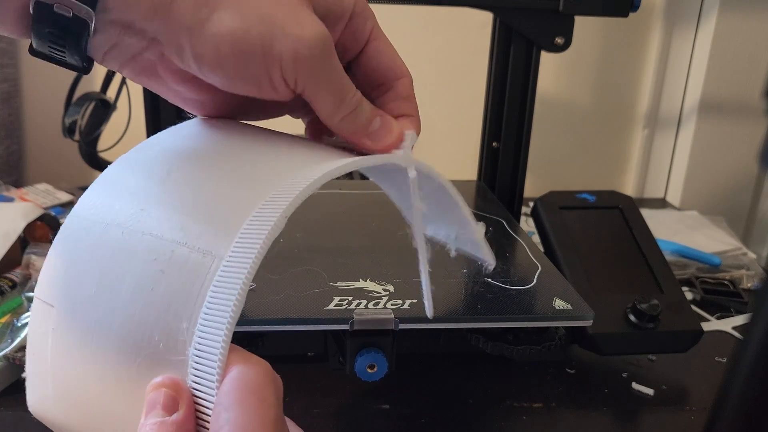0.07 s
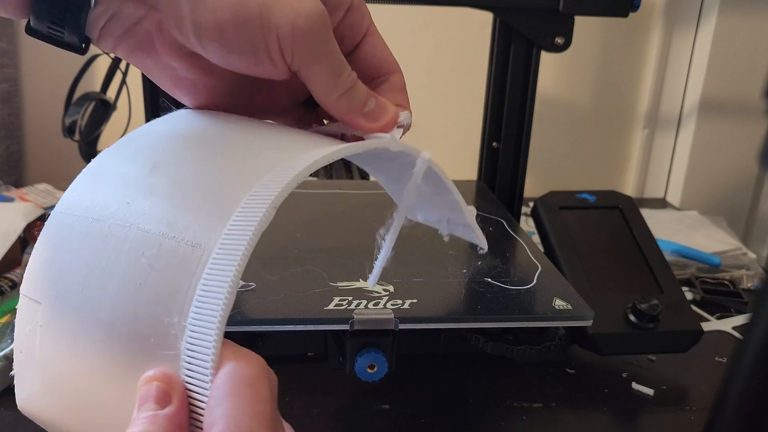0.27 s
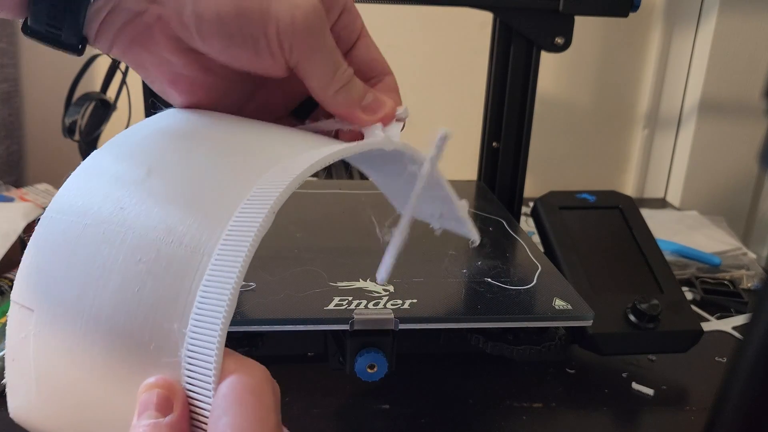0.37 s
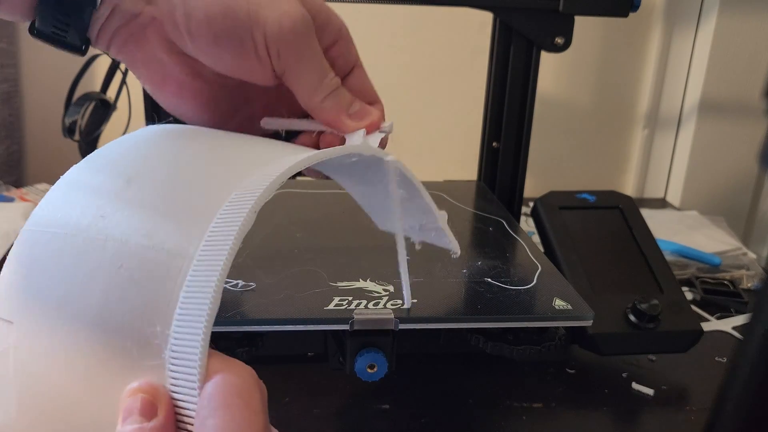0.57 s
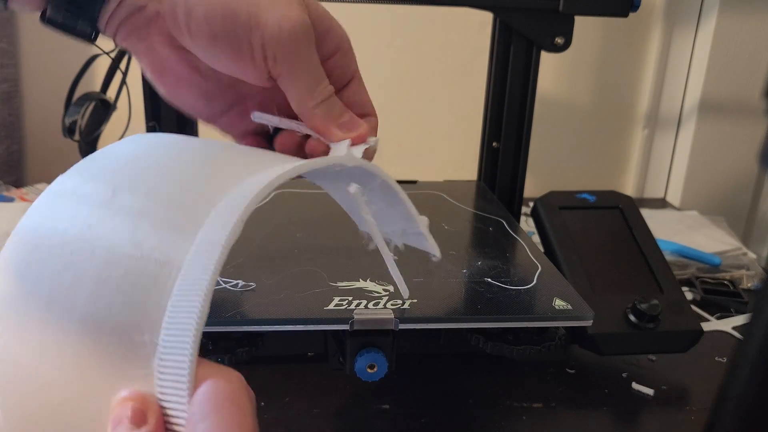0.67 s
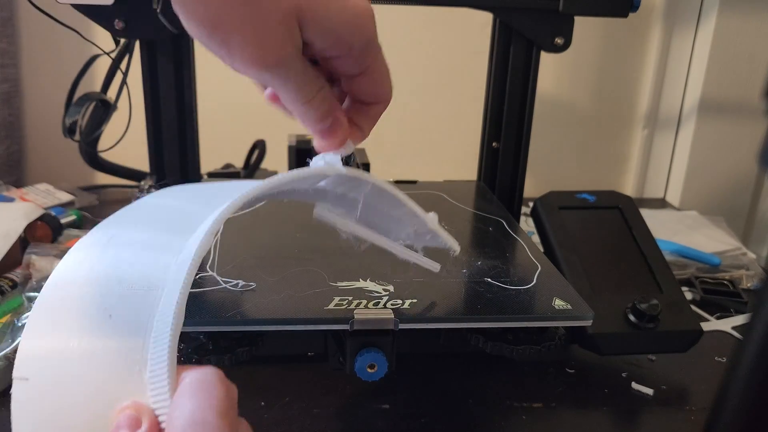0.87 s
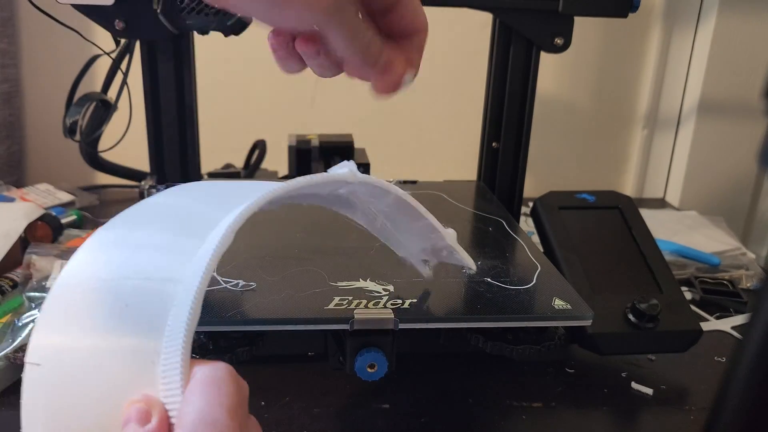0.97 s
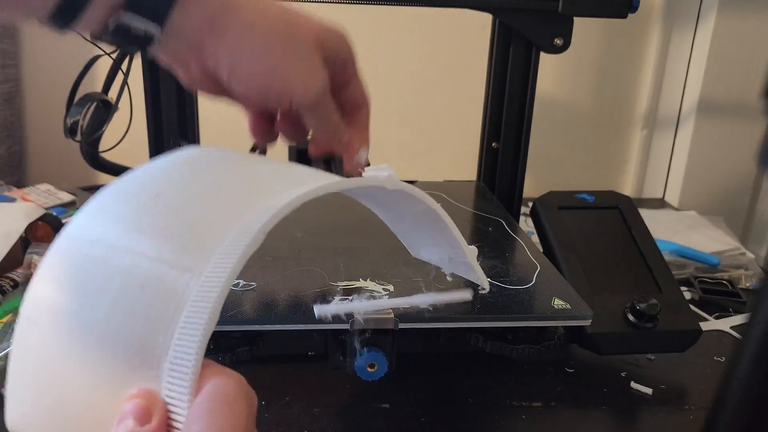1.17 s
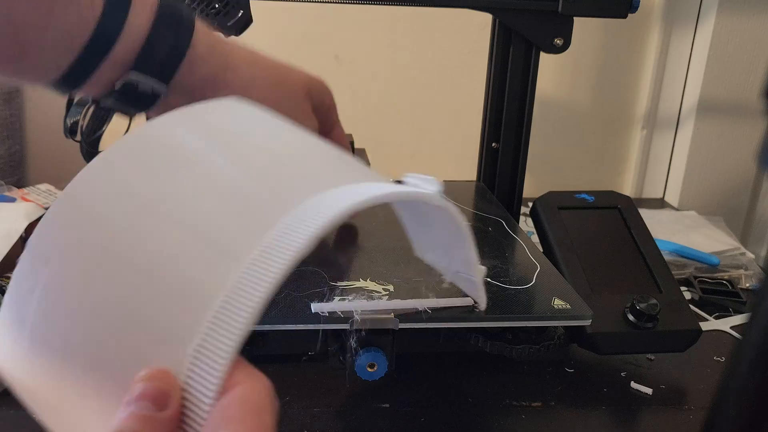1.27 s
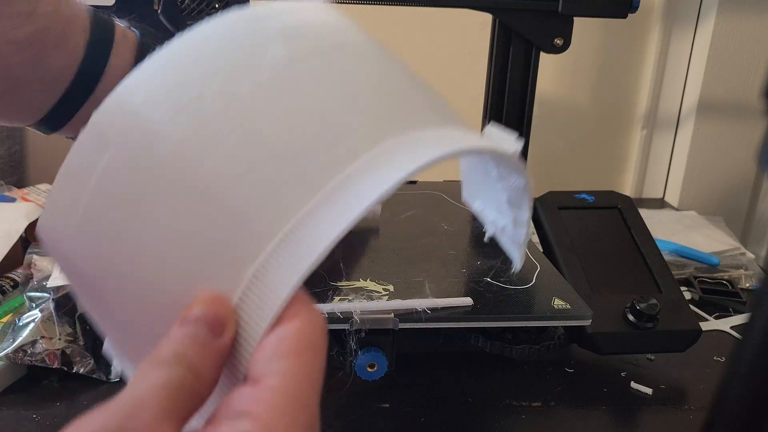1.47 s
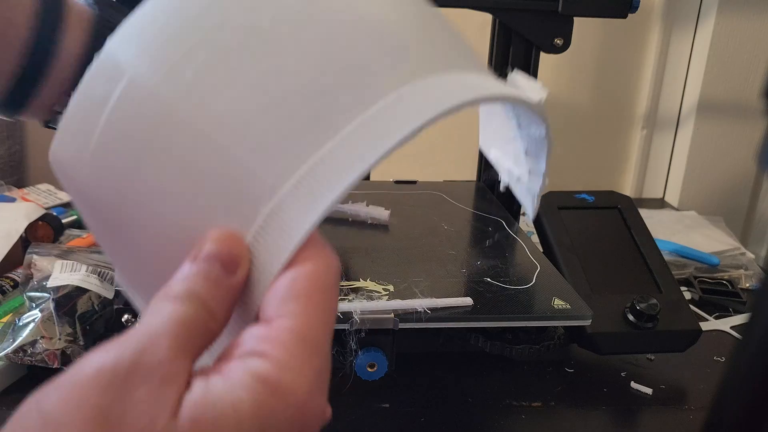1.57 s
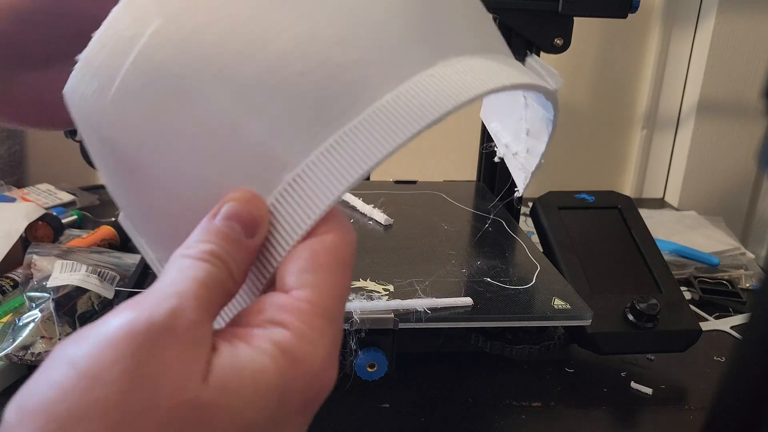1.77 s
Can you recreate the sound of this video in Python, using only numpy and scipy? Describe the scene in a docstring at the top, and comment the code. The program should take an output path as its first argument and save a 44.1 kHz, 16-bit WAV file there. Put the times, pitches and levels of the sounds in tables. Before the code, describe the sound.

Brittle plastic snapping: sharp dense cracks in quick bursts, thinning to faint ticks and creaks

```python
"""Thin plastic support strands crack off a curved printed shell, flexed by two hands close to a stereo microphone pair.
Each crack is a short rough noise burst filtered by the shell's resonances, with two dying notes; splinters trail it.
A small metal part ticks at the wrist: noise through sharp high resonances. Fingers rustle (bright noise grains)
and rumble (low noise) on the shell. A small room answers with noise tails, over a faint hum, tones and hush."""
import sys
import numpy as np
from scipy import signal
from scipy.fft import rfft, irfft, next_fast_len
from scipy.io import wavfile
from scipy.ndimage import map_coordinates

SR = 44100
rng = np.random.default_rng(int(sys.argv[2]) if len(sys.argv) > 2 else 0)


def wav_out(sig):
    """Save sig, one row per channel (or a flat mono array), as 16-bit PCM at SR to the path in sys.argv[1]."""
    wavfile.write(sys.argv[1], SR, np.round(np.clip(np.atleast_2d(sig).T, -1, 1) * 32767).astype(np.int16))


N = 79380  # samples, 1.8 s


def amp(db):
    """dB to gain."""
    return 10 ** (np.asarray(db) / 20)


def unit(x):
    """Scaled to rms 1."""
    return x / np.sqrt(np.mean(x ** 2) + 1e-20)


def along(points, hz):
    """(Hz, value) points read on a log frequency axis."""
    f, v = np.transpose(points)
    return np.interp(np.log(hz + 1), np.log(f + 1), v)


def over_time(points):
    """(s, value) points joined by straight lines over the whole scene."""
    return np.interp(np.arange(N) / SR, *np.transpose(points))


def wobble(rate, size=N):
    """A smooth random curve around 0, rate knots a second."""
    knots = rng.standard_normal(size // 8 + 8)
    return map_coordinates(knots, [np.arange(size) * min(rate / SR, 1 / 8)])


def wavering_sine(hz, drift_hz, drift_rate):
    """A sine of rms 1 whose pitch drifts at random."""
    return np.sqrt(2) * np.sin(2 * np.pi * np.cumsum(hz + drift_hz * wobble(drift_rate)) / SR)


def filtered(x, response):
    """x times a complex response of frequency, padded against wrap-around."""
    m = next_fast_len(x.shape[-1] + 4096)
    spectrum = rfft(x, m) * response(np.fft.rfftfreq(m, 1 / SR))
    return irfft(spectrum, m)[..., :x.shape[-1]]


def band(lo_hz, hi_hz):
    """Causal band-pass with power gain 1 for white noise."""
    def edges(f):
        low_cut = (1j * f / lo_hz / (1 + 1j * f / lo_hz)) ** 2
        return low_cut / (1 + 1.4j * f / hi_hz - (f / hi_hz) ** 2) ** 2
    return lambda f: edges(f) / np.sqrt(np.mean(np.abs(edges(f)) ** 2))


def ring(f, hz, width):
    """Response of one resonance, gain 1 at its centre."""
    return 1j * f * width / (hz * hz - f * f + 1j * f * width)


# Hush of the room. Each row: frequency in Hz, relative density in dB per Hz.
HUSH_SPECTRUM = [(15, -32.5), (25, -4), (192, -6), (358, -5), (706, -12.5), (1430, -21), (1600, -19),
                 (9330, -31.5), (15200, -25.5), (16500, -50)]
# How alike the hush is at the two ports. Each row: frequency in Hz, left-right correlation.
HUSH_LIKENESS = [(40, 1), (250, 0.43), (1000, .3), (4000, .05)]
# Low hum. Each row: time in seconds, middle level in dB rms.
HUM_LEVEL = [(0.0, -63.5), (0.42, -62), (0.626, -68), (0.802, -62), (0.922, -65.5), (1.148, -66.5),
             (1.724, -66.5), (1.8, -67.5)]
# Faint wavering tones in the room. Each row: middle frequency in Hz, middle level in dB rms.
ROOM_TONES = [(195, -77.5), (725, -77)]
HUSH_DB, HUSH_WAVER_DB = -63.5, 2.5
HUM_HZ, HUM_WAVER_DB, TONE_WAVER_DB = 58, 2.5, 9


def background():
    """Room hush, most alike at both ports in the bass, an unsteady low hum and faint tones."""
    def mid_side(hz):
        turn = np.arccos(np.clip(along(HUSH_LIKENESS, hz), -1, 1)) / 2
        return amp(along(HUSH_SPECTRUM, hz)) * [np.cos(turn), np.sin(turn)]
    mid, side = filtered(rng.standard_normal((2, N)), mid_side)
    hush = np.array([mid + side, mid - side]) / np.sqrt(np.mean(mid ** 2))
    hum = wavering_sine(HUM_HZ, 2.2, 0.9) * amp(over_time(HUM_LEVEL) + HUM_WAVER_DB * wobble(26))
    tones = sum(amp(db + TONE_WAVER_DB * wobble(21)) * wavering_sine(hz, 4, 2.9) for hz, db in ROOM_TONES)
    return amp(HUSH_DB + HUSH_WAVER_DB * wobble(18)) * hush + hum + tones


# Decay of the small room. Each row: frequency in Hz, time to fall 60 dB in seconds.
ROOM_DECAY = [(150, 0.06), (700, 0.25), (2500, 0.23), (6000, 0.22), (14000, 0.2)]
ROOM_DB, ROOM_DELAY_S = -10.5, 0.0024
FLUTTER_DB, FLUTTER_PER_S = 3, 90  # the echo's level flutters at random


def room(x):
    """Noise tails dying at each frequency's own speed, new for every 0.15 s of sound; their level flutters."""
    out, step = np.zeros((2, N + SR)), int(.15 * SR)
    for at in range(0, N, step):
        hz, t, z = signal.stft(rng.standard_normal((2, SR // 2)), SR, nperseg=256)
        decay = amp(-60 * t / along(ROOM_DECAY, hz)[:, None])
        tail = signal.istft(z * decay, SR, nperseg=256)[1]
        wet = signal.fftconvolve(x[:, at:at + step], tail / np.linalg.norm(tail[0]), axes=1)
        out[:, at + round(ROOM_DELAY_S * SR):][:, :wet.shape[1]] += wet
    return out[:, :N] * amp(FLUTTER_DB * wobble(FLUTTER_PER_S))


# Hands on the shell. Each row: time in seconds, middle level of the low rumble in dB rms.
HANDLING_LEVEL = [(0.0, -64), (0.46, -65.5), (0.836, -68), (1.178, -64), (1.308, -68.5), (1.724, -70),
                  (1.8, -65.5)]
HANDLING_HZ, HANDLING_LUMP_DB = (80, 190), 3


def handling():
    """Hands shifting the shell give a lumpy low rumble: band-passed noise, partly shared by the ports."""
    shared, left, right = rng.standard_normal((3, N))
    pair = np.array([shared + 0.33 * left, shared + 0.62 * right])
    low = unit(filtered(pair, band(*HANDLING_HZ)))
    return low * amp(over_time(HANDLING_LEVEL) + HANDLING_LUMP_DB * wobble(11))


# Brushing close to the ports. Each row: time in seconds, level of the fine rustle in dB.
RUSTLE_LEVEL = [(0.0, -58.5), (0.254, -65), (0.36, -60), (0.466, -47), (0.742, -62), (1.298, -66.5),
                (1.448, -87), (1.8, -83)]
RUSTLE_PER_S, RUSTLE_T60, RUSTLE_HZ = 690, .015, 4003  # grains a second, decay in s, low edge in Hz
RUSTLE_SPREAD_DB = 3


def rustle():
    """Loose plastic hairs and fingers brush the shell: tiny bright noise grains at random moments."""
    t = np.arange(SR // 50) / SR
    strength = amp(RUSTLE_SPREAD_DB * rng.exponential(size=N))
    hits = (rng.random(N) < RUSTLE_PER_S / SR) * strength
    envelope = np.convolve(hits, amp(-60 * t / RUSTLE_T60))[:N]
    grains = envelope * rng.standard_normal((2, N))
    bright = unit(filtered(grains, band(RUSTLE_HZ, SR / 2.2)))
    return bright * amp(over_time(RUSTLE_LEVEL))


# Ticks at the wrist. Each row: start in seconds, level in dB, swell in seconds.
WRIST_TICKS = [(.006, -35, 0.018), (0.134, -50, 0.0077), (0.289, -46.5, 0.017), (0.337, -47, 0.0062)]
# Metal resonances, each applied twice. Each row: frequency in Hz, level in dB, width of one pass in Hz.
METAL_MODES = [(7125, -15, 590), (11480, 12, 200), (11780, -12.5, 1500), (12490, -8.5, 200)]
TICK_T60, TICK_PAN_DB = 0.029, -6  # decay in s; negative leans right


def ticks():
    """A small metal part scrapes briefly and sings high and thin: noise through narrow resonances."""
    out, t = np.zeros(N + SR), np.arange(SR // 8) / SR

    def metal(f):
        return sum(amp(level) * ring(f, hz, width) ** 2 for hz, level, width in METAL_MODES)
    for s, db, swell in WRIST_TICKS:
        song = unit(filtered(rng.standard_normal(len(t)), metal))
        envelope = np.where(t < swell, (t / swell) ** 2, amp(-60 * (t - swell) / TICK_T60))
        out[round(s * SR):][:len(t)] += amp(db) * song * envelope
    return out[:N] * amp([[TICK_PAN_DB / 2], [-TICK_PAN_DB / 2]])


def struck(after, hz, q, rise):
    """One dying note, pushed either way."""
    decay = np.exp(-np.pi * hz * after / q)
    return rng.choice([-1, 1]) * np.sin(2 * np.pi * hz * after) * (1 - np.exp(-after / rise)) * decay


# Resonances of the shell. Each row: frequency in Hz, width in Hz, middle level in dB over the bare crack.
SHELL_MODES = [(1076, 59, 2), (1321, 110, 2.5), (1682, 22, -2.5), (2240, 250, -15.5), (2437, 70, 3),
               (3110, 380, 2), (3720, 160, -2.5), (6314, 24, 4.5), (7210, 92, -4)]
MODE_SCATTER_DB = 3  # change of each mode from crack to crack
STRAND_Q, STRAND_DB = 5, -2  # sharpness and level of the strand's own note in the burst


def shell(strand_hz):
    """The bare crack, the strand's note and the shell's resonances, weighted anew for each breaking point."""
    new_db = MODE_SCATTER_DB * rng.standard_normal(len(SHELL_MODES))

    def response(f):
        strand = amp(STRAND_DB) * ring(f, strand_hz, strand_hz / STRAND_Q)
        modes = sum(amp(db + new) * ring(f, hz, width) for (hz, width, db), new in zip(SHELL_MODES, new_db))
        return 1 + strand + modes
    return response


LEAD_S, NOTE_LEAD_S = 0.00017, .00007  # left port hears first; the notes lead by less than the bursts
UNLIKE_DB, UNLIKE_HZ = 3, 930  # part of each burst that differs between ports, fading below this Hz
ONSET_S = 0.0004  # delay from each row's time to the burst's front
RISE_S, SOFTER = .0004, .15  # attack of a crack at 0 dB; dB longer for each dB weaker
SNAP_DB, SNAP_T60 = -3, 0.0028  # sharp front of each burst
SWELL_DB, SWELL_S = -27, .005  # faint noise rising for a few ms before each burst
GRAIN_DB, GRAINS_PER_S = 2.5, 1500  # unevenness of the burst
SPLINTERS_PER_S, SPLINTER_DB, SPLINTER_T60, SPLINTER_SPREAD_DB = 250, -3, .07, 2.5  # trailing crackle
NOTE_DB, NOTE_Q, NOTE_RISE_S = 1.5, 18, .0008  # the strand's note rung clear, over the crack's level
KNOCK_DB, KNOCK_Q = 5, 4.75  # the shell's low knock, over the row's band levels read at its pitch
# Breaking strands. Each row: time in seconds, level in dB, levels of the five bands in dB over it before
# the band gain, strand note in Hz, knock in Hz, left over right in dB, burst t60 in seconds before the stretch.
STRAND_CRACKS = [(0.055, -18, -27.5, -12.5, -7.5, -10, -18, 2006, 723, 9, 0.012),
                 (0.201, -2, -37, -11, -12.5, -9.5, -15, 3240, 154, 8, 0.0083),
                 (0.204, -11.5, -28, -10.5, -6.5, -24, -20, 2130, 248, -2.5, 0.03),
                 (0.221, -7.5, -38, -25, -15.5, -13, -15.5, 3010, 480, 8.5, 0.028),
                 (0.231, -15.5, -29, -28, -19, -14, -16.5, 2740, 267, 7, 0.034),
                 (0.236, -18.5, -20.5, -20, -15, -8.5, -11.5, 3116, 130, 5, 0.014),
                 (0.255, -23.5, -32, -39, -37, -11, -13, 3030, 404, 1, 0.024),
                 (0.258, -20.5, -45, -46, -36, -21, -6.5, 2970, 390, 4.5, 0.019),
                 (0.361, -16.5, -35, -21.5, -17.5, -11, -12.5, 3066, 390, 9.5, 0.016),
                 (0.412, -28.5, -33, -28, -17, -15.5, -15, 3070, 410, -8.5, 0.048),
                 (0.428, -15.5, -23, -51, -9.5, -5.5, -11.5, 3350, 280, 5.5, 0.031),
                 (0.435, -5, -67, -27, -11, -9, -9.5, 3724, 700, 2.5, 0.014),
                 (0.442, -11.5, -41, -21, -8.5, -11, -10.5, 2950, 670, 1.5, 0.017),
                 (0.446, -19, -50, -45, -18, -31, -11, 3360, 774, 1.5, 0.02),
                 (0.452, -24, -24.5, -26, -9.5, -9, -20, 1810, 650, 0, 0.046),
                 (0.557, -43, -26, -23, -9, -9, -14.5, 3630, 371, 4, 0.098),
                 (0.579, -31, -19.5, -12, -4.5, -1, -2, 2840, 690, 5.5, 0.045),
                 (0.615, -11.5, -25, -10, -7, -8, -10, 2044, 730, 6.5, 0.018),
                 (0.627, -24, -33, -14, -14, -20, -7, 3440, 76, 5, 0.017),
                 (0.637, -17.5, -42, -34, -18.5, -11.5, -17, 3220, 678, -2.5, 0.016),
                 (0.645, -16, -43, -16, -25, -7, -6.5, 3880, 229, 4, 0.011),
                 (0.655, -20.5, -33, -15, -12.5, -6.5, -11, 4160, 400, 1.5, 0.053),
                 (0.659, -27.5, -15, -13.5, -10, -1, 2.5, 2800, 393, 12.5, 0.018),
                 (0.662, -13.5, -26, -10.5, -15, -11.5, -9, 3180, 980, 4.5, 0.02),
                 (0.747, -38.5, -32, -23, -31, -34, -7.5, 4300, 277, 7.5, 0.018),
                 (0.813, -46, -17, -29, -7, -22, -0.5, 3750, 143, 8.5, 0.05),
                 (0.818, -40.5, -41, -28, -15, 0, -11, 3030, 393, 4, 0.026),
                 (0.824, -25, -24, -10.5, -9, -0.5, -1, 4100, 944, 8, 0.029),
                 (0.846, -17, -33, -33, -23.5, -8.5, -11, 3190, 398, 7, 0.02),
                 (0.854, -22, -29, -22.5, -16.5, -15, -19.5, 2580, 403, 4.5, 0.056),
                 (0.87, -37, -23, -17, -27, -34, -26.5, 2440, 229, 0.5, 0.026),
                 (0.899, -34.5, -19.5, -21, -13, -30, -17.5, 2940, 308, 14.5, 0.0066),
                 (0.921, -27, -44, -19, -50, -8, -5, 3080, 135, 6.5, 0.021),
                 (0.931, -24, -32, -32, -12.5, -14.5, -14.5, 2900, 799, 9.5, 0.019),
                 (0.939, -29, -56, -22.5, -48, -11, -17.5, 2880, 164, 5.5, 0.022),
                 (0.951, -32, -28, -34, -12.5, -11, -22, 3080, 217, 5.5, 0.016),
                 (1.021, -21, -18.5, -6, -5.5, -15, -17.5, 3052, 254, 13.5, 0.015),
                 (1.023, -20.5, -31.5, -49, -17.5, -15, -15.5, 2180, 124, 4.5, 0.067),
                 (1.052, -25, -26, -9, -12.5, -15, -12.5, 3450, 640, 4.5, 0.0096),
                 (1.074, -40.5, -14.5, -18, -12, -10, -9, 2310, 320, 7.5, 0.049),
                 (1.094, -41, -21.5, -26.5, -26, -9.5, -9.5, 3430, 234, 4.5, 0.067),
                 (1.12, -43.5, -26, -24.5, -20, -11.5, -16, 2800, 199, 6, 0.021),
                 (1.135, -46.5, -16, -12.5, -13, -17, -18, 3070, 133, 7, 0.12),
                 (1.227, -42, -19, -4, -8, -6.5, -5, 1940, 190, 6, 0.047),
                 (1.245, -54.5, -15, -35.5, -26.5, -7.5, -14, 3900, 217, 4, 0.056),
                 (1.261, -31.5, -32, -19, -32, -11.5, -15.5, 3790, 216, 7, 0.018),
                 (1.292, -48.5, -33, -44.5, -34.5, -23, -11, 2690, 176, 8.5, 0.023),
                 (1.312, -46.5, -25, -26, -17, -14.5, -6.5, 2530, 131, 1.5, 0.053),
                 (1.331, -46.5, -18.5, -7.5, -13, -9, -10.5, 1930, 133.6, 3, 0.036),
                 (1.405, -37.5, -18, -9.5, -8.5, -23.5, -29, 1100, 764, 9.5, 0.032),
                 (1.414, -47.5, -12, 1.5, -20.5, -11.5, -15.5, 1153, 180, 7, 0.03),
                 (1.451, -48.5, -9, -5.5, -7, -1.5, -2.5, 6560, 141.4, 6.5, 0.017),
                 (1.483, -51.5, -16, -13.5, -14, -13.5, -13.5, 1258, 131.7, 9, 0.043),
                 (1.625, -44.5, -17, -6.5, -10.5, -17.5, -21, 2830, 1032, 4, 0.03),
                 (1.667, -42.5, -23, -11.5, -16.5, -17, -13, 2660, 433, 2.5, 0.077),
                 (1.697, -41, -14, -2.5, -6.5, -19.5, -14, 2010, 990, 5.5, 0.017)]
# Burst bands. Each row: low edge in Hz, high edge in Hz, stretch of the burst t60 as a factor, gain in dB.
BURST_BANDS = [(101.7, 804, 3.28, 5.5), (600, 1305, 2, -0.5), (1470, 2536, 1.96, 3),
               (2600, 4950, 1.328, 6.5), (5330, 24800, 1.1, 8)]


def cracks():
    """A faint noise swell leads into each uneven burst; strand note and shell knock ring, splinters trail."""
    size, lead = SR // 8, SR // 50
    out = np.zeros((2, 2, N + SR))  # bursts and notes, each left and right
    t = (np.arange(size) - lead) / SR
    after = np.maximum(t, 0)
    centres = [np.sqrt(lo * hi) for lo, hi, *_ in BURST_BANDS]
    for s, level_db, *bands_db, strand_hz, knock_hz, pan_db, t60 in STRAND_CRACKS:
        shared, left, right = rng.standard_normal((3, size))
        grain = amp(GRAIN_DB * wobble(GRAINS_PER_S, size=size))
        unlike = filtered(np.array([left, right]), lambda f: 1j * f / (UNLIKE_HZ + 1j * f))
        pair = grain * (shared + amp(UNLIKE_DB) * unlike)

        rise = RISE_S * amp(-SOFTER * level_db)
        front = (1 - np.exp(-after / rise)) * (1 + amp(SNAP_DB - 60 * after / SNAP_T60))
        swell = amp(SWELL_DB) * np.exp(np.minimum(t, 0) / SWELL_S)

        hits = (rng.random(size) < SPLINTERS_PER_S / SR) & (t > 0)
        spread_db = SPLINTER_SPREAD_DB * rng.exponential(size=size)
        splinters = hits * amp(SPLINTER_DB + spread_db - 60 * after / SPLINTER_T60) * np.sign(shared)

        burst = 0
        for db, (lo, hi, stretch, gain_db) in zip(bands_db, BURST_BANDS):
            shape = (front + swell) * amp(-60 * after / (t60 * stretch))
            part = unit(filtered(pair * shape, band(lo, hi))) * np.sqrt(np.mean(shape ** 2))
            burst = burst + amp(db + gain_db) * (part + filtered(splinters, band(lo, hi)))

        knock_db = KNOCK_DB + along(list(zip(centres, bands_db)), knock_hz)
        note = amp(NOTE_DB) * struck(after, strand_hz, NOTE_Q, NOTE_RISE_S)
        notes = note + amp(knock_db) * struck(after, knock_hz, KNOCK_Q, rise)
        both = np.array([filtered(burst, shell(strand_hz)), [notes, notes]])
        ports = amp([[level_db + pan_db / 2], [level_db - pan_db / 2]])
        out[..., round((s + ONSET_S) * SR) - lead:][..., :size] += both * ports

    def left_first(x, lead_s):
        shift_s = lead_s * np.array([[.5], [-.5]])
        return filtered(x[:, :N], lambda f: np.exp(2j * np.pi * f * shift_s))
    return left_first(out[0], LEAD_S) + left_first(out[1], NOTE_LEAD_S)


def scene():
    """Cracks, ticks and rustle near the ports, their room, handling and background."""
    near = cracks() + ticks() + rustle()
    return near + amp(ROOM_DB) * room(near) + handling() + background()


# Colour of the microphone pair. Each row: frequency in Hz, gain in dB.
MIC_COLOUR = [(100, -1.5), (1000, -6), (6000, -1.5), (8000, 4), (9600, -8.5), (11500, -5), (15000, -4)]
TOP_HZ, EDGE_HZ, EDGE_WIDTH_HZ, EDGE_DB = 16900, 15900, 60, -18  # silent from the top; a step down at the edge


def record(dry):
    """Soft overload, microphone colour with a dip near 10 kHz, then the band limit."""
    dry = dry / (1 + np.abs(dry / .97) ** 6) ** (1 / 6)

    def microphone(hz):
        edge_db = EDGE_DB * (1 + np.tanh((hz - EDGE_HZ) / EDGE_WIDTH_HZ)) / 2
        return amp(along(MIC_COLOUR, hz) + edge_db) * (hz < TOP_HZ)
    return filtered(dry, microphone)


dry = scene()
out = record(dry)
wav_out(out)
```